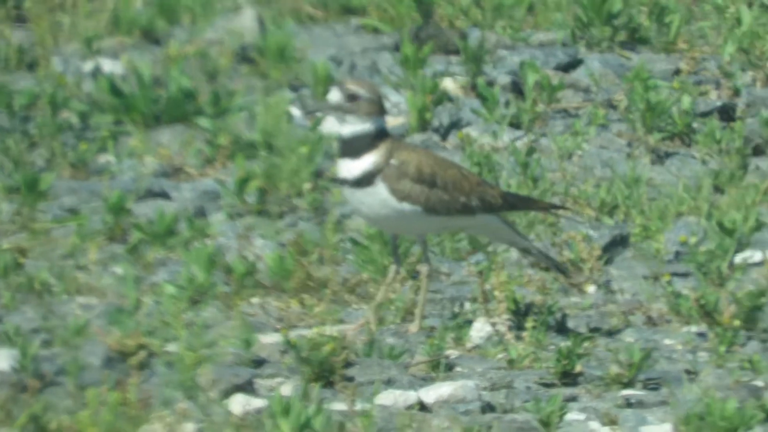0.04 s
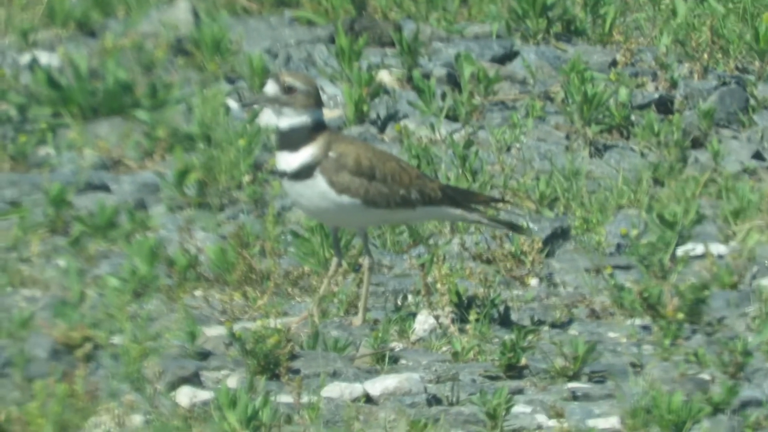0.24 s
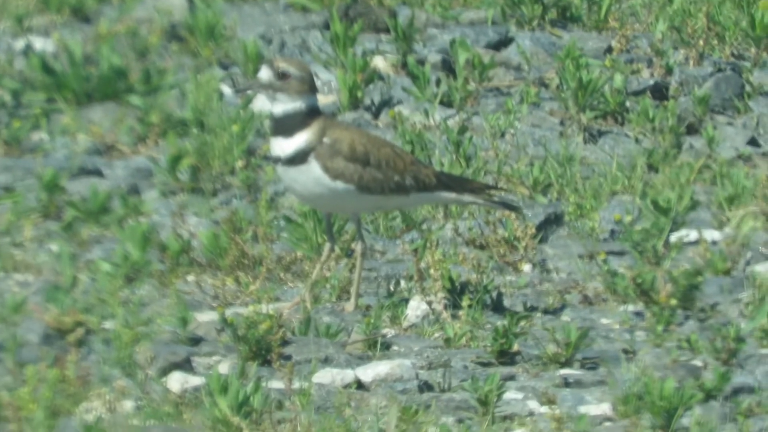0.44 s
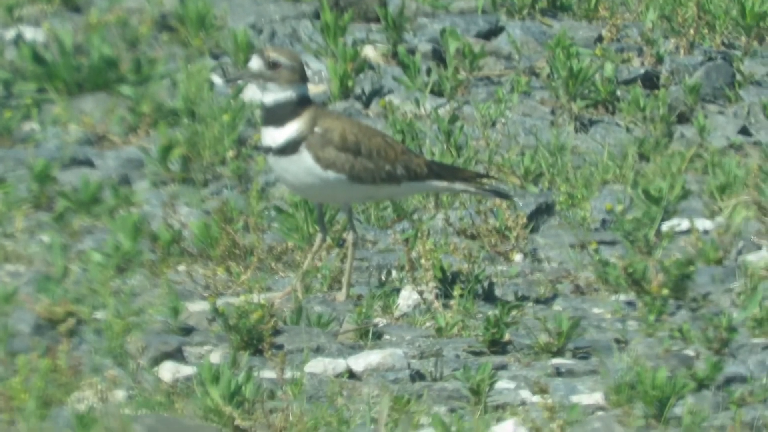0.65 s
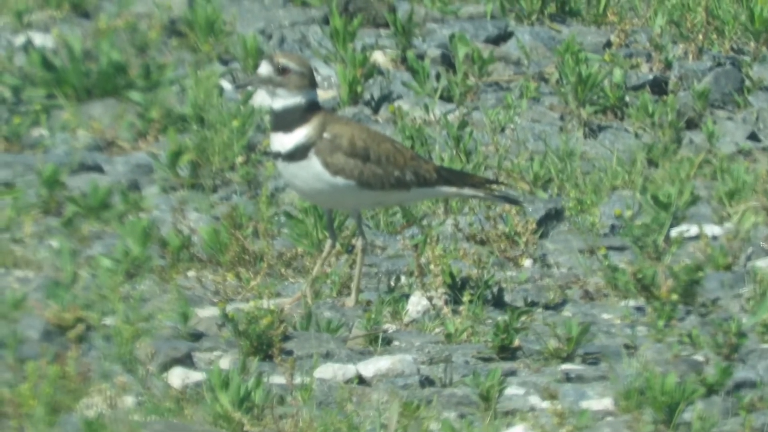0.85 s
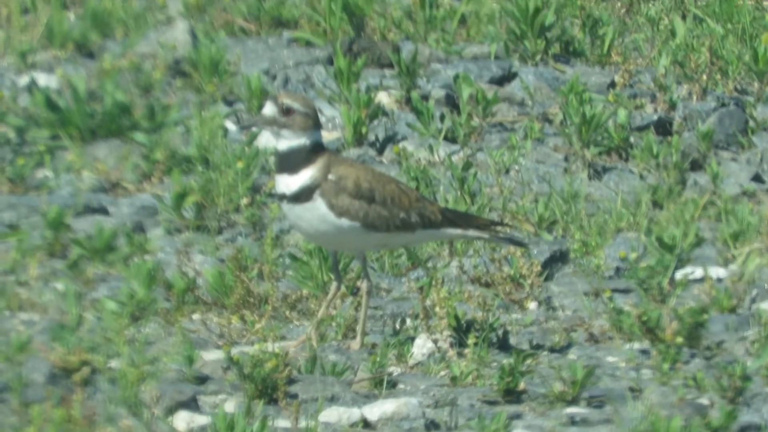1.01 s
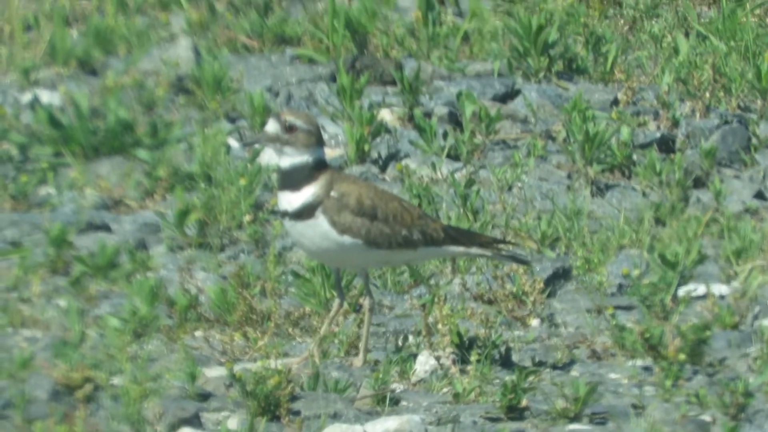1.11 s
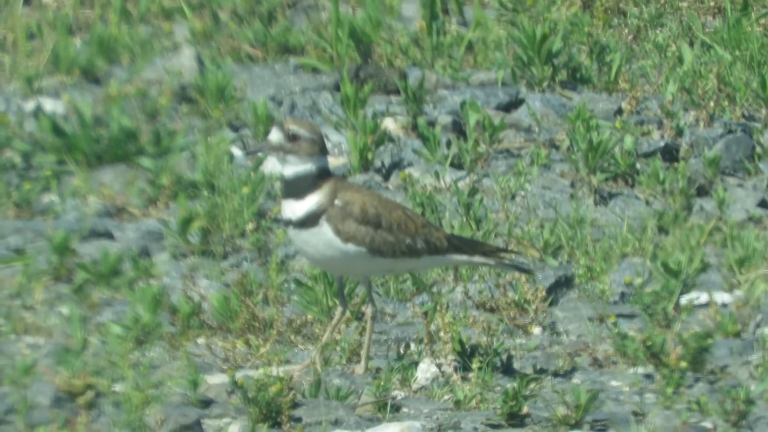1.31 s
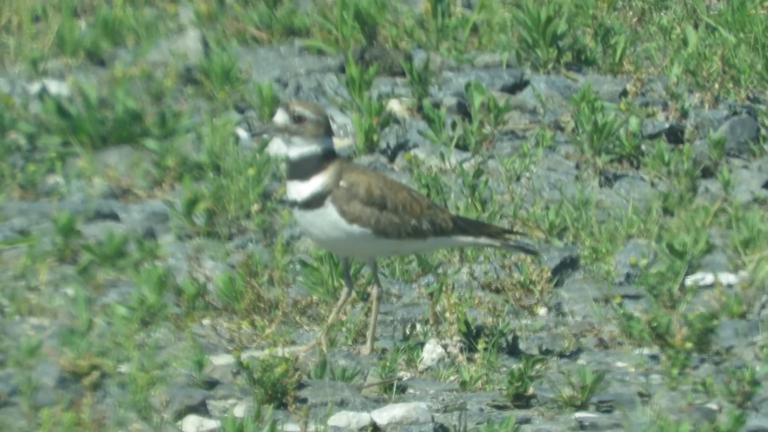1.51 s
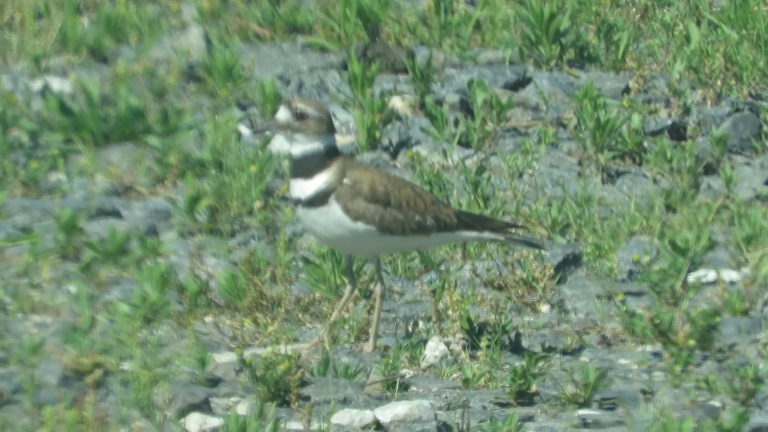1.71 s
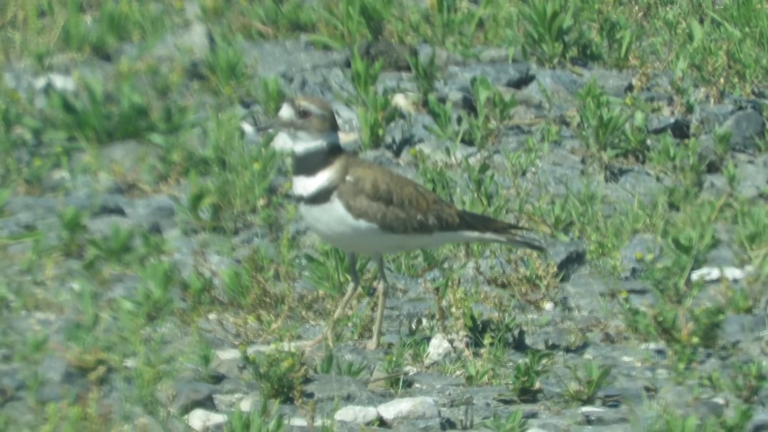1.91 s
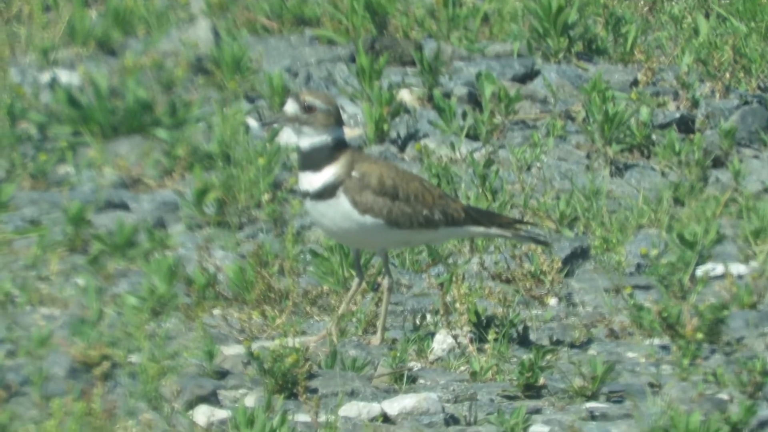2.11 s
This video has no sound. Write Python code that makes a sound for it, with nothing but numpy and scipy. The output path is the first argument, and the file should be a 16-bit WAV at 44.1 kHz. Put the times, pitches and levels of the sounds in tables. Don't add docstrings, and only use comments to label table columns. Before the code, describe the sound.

Four bright, brief bird pipes ring out, with fainter whistles and chips behind and soft outdoor hiss.

```python
import sys
import numpy as np
from scipy import signal
from scipy.fft import rfft, irfft, next_fast_len
from scipy.io import wavfile
from scipy.ndimage import uniform_filter1d, minimum_filter1d

SR = 44100
rng = np.random.default_rng(int(sys.argv[2]) if len(sys.argv) > 2 else 0)


def master(y):
    cut = np.clip(np.atleast_2d(y).T, -1, 1)
    pcm = np.round(cut * 32767)
    wavfile.write(sys.argv[1], SR, pcm.astype(np.int16))


def invert_db(x):
    u = np.asarray(x, float) / 20
    return 10 ** u


N = 94815
LEAD = SR // 2


def read(points, hz):
    f, value = np.transpose(points)
    return np.interp(np.log(hz + 1), np.log(f + 1), value)


def add(mix, s, sound):
    part = mix[round(s * SR) + LEAD:][:len(sound)]
    part += sound[:len(part)]


def wander(length, size):
    noise = rng.standard_normal(length)
    return uniform_filter1d(uniform_filter1d(noise, size=size), size=size)


def turns(hz):
    wobble = 0.0014 * 24 * wander(len(hz), 400)
    return 2 * np.pi * (np.cumsum(hz * (1 + wobble)) / SR + rng.random())


def curve(rows):
    rows = np.array(rows)
    t = np.arange(rows[0, 0], rows[-1, 0], 1 / SR)
    ends = np.clip(np.minimum(t - t[0], t[-1] - t) / 0.0018, 0, 1)
    lines = [np.interp(t, rows[:, 0], column) for column in rows[:, 1:].T]
    return t, ends, [uniform_filter1d(line, size=70, mode="nearest") for line in lines]


def call(stretch, effort_db, hz, bright_db, hold_db):
    # (time from start [s], pitch / resting pitch, effort [dB])
    shape = [
        (0, 0.92, -25),
        (.002, 1.025, -7.5),
        (.012, 1.068, 0.5),
        (.028, 1.036, -1),
        (.046, 1.0, -2.5),
        (.1, 1.0, 1.5),
        (.118, 1.027, 0),
        (.126, 1.015, -9.5),
        (.137, 0.99, -32),
    ]
    partials_db = [-7.5, .5, -20, -19, -42, -41.5, -39]
    lift_db = [-2, .1, 5, -1, 6, 4, .1]
    t, ends, (bend, db) = curve(np.array(shape) * [stretch, 1, 1])
    phase = turns(hz * bend)
    late = np.clip((t - t[0]) / 0.008, 0, 1) ** 3
    lift = np.clip((bend - 1) / 0.03, 0, 1) * (t > 0.003) + (t <= 0.003)
    voice = invert_db(-46) * np.cos(0.868 * phase)
    for k, partial_db in enumerate(partials_db):
        level_db = partial_db + k * bright_db + lift_db[k] * (lift - 0.5)
        if k == 1:
            level_db = level_db + hold_db * (1 - lift)
        partial = invert_db(level_db) * np.cos((k + 1) * phase)
        voice += partial * late if k % 2 == 0 else partial
    return np.sqrt(2) * ends * invert_db(effort_db + db) * voice


def near_calls():
    # (start [s], stretch, effort [dB], resting pitch [Hz], brightness per partial [dB])
    calls = [
        (-.265, 1.0, -23, 2160, .01),
        (.1945, 0.97, -23, 2167, 0.1),
        (0.6317, 1.024, -23.5, 2150, 0.35),
        (1.229, 1.0, -24, 2125, 0.25),
        (1.7925, 1.005, -24.5, 2122, 0.07),
    ]
    holds_db = [0, -2.5, -8, -5.5, -4.5]
    ground_s, ground_share = 0.00212, 0.28
    mix = np.zeros(N + LEAD)
    for (s, *settings), hold_db in zip(calls, holds_db):
        add(mix, s, call(*settings, hold_db))
    size = next_fast_len(len(mix))
    f = np.fft.rfftfreq(size, 1 / SR)
    ground = 1 + ground_share * np.exp(-2j * np.pi * f * ground_s)
    ground = ground / np.sqrt(1 + ground_share ** 2)
    return irfft(rfft(mix, size) * ground, size)[:len(mix)]


def echo(x, colour, slower, banks_db):
    # (pitch [Hz], time [s])
    echo_t60 = [(1500, .15), (3000, 0.18), (4400, .09), (8000, 0.069)]
    # (delay [s], level [dB])
    banks = [
        (.01198, 4.5),
        (.03, -5),
        (.05, -16),
    ]
    taps = np.zeros(SR)
    count = SR // 20 - 1
    spots = np.arange(0, SR - 20, 20) + rng.integers(0, 20, count)
    taps[spots] = rng.choice([-1., 1.], count)
    hz, t, z = signal.stft(taps, SR, nperseg=256)
    fade = invert_db(-60 * t / (slower * read(echo_t60, hz)[:, None]))
    fade = fade + invert_db(-15 - 60 * t / 0.34)
    reach_s, reach_fade_s = 0.168, 0.01
    fade = fade / (1 + np.exp(np.clip((t - reach_s) / reach_fade_s, -50, 50)))
    fade = fade + invert_db(-47 - 60 * t / 1.2)
    tail = signal.istft(z * fade, SR, nperseg=256)[1]
    gap_s = 0.0075
    tail = tail * np.clip(np.arange(len(t) * 128 - 128) / SR / gap_s - 1, 0, 1)
    size = next_fast_len(len(x) + len(tail))
    f = np.fft.rfftfreq(size, 1 / SR)
    paths = invert_db(-0.5) * rfft(tail / np.linalg.norm(tail), size)
    for s, db in banks:
        paths = paths + invert_db(db + banks_db) * np.exp(-2j * np.pi * f * s)
    return irfft(rfft(x, size) * paths * invert_db(read(colour, f)), size)[:len(x)]


def air():
    # (pitch [Hz], level per Hz [dB])
    hiss = [(30, -38), (90, -14.5), (186, -5), (380, -10.5), (1400, -13), (2300, -21), (3500, -19.5),
            (12000, -26)]
    # (pitch [Hz], width [Hz], level [dB])
    humps = [
        (194, 17, 3),
        (505, 89, 3.5),
        (1280, 220, 2),
    ]
    frames, hz = N // 1024 + 5, np.fft.rfftfreq(4096, 1 / SR)
    a, b, patches = rng.standard_normal((frames, 2049, 3)).T
    patches = uniform_filter1d(uniform_filter1d(patches, size=42, axis=0), size=4, axis=1) * 13
    gusts_db = 5.5 * 2 * uniform_filter1d(rng.standard_normal(frames), size=4)
    gusts = gusts_db * np.exp(-hz[:, None] / 120)
    colour = read(hiss, hz) - 14.5 * np.clip((hz - 12400) / 300 + 1, 0, 1)
    for hump_hz, width_hz, db in humps:
        colour = colour + db * np.exp(-((hz - hump_hz) / width_hz) ** 2)
    level = invert_db(colour[:, None] + 1.5 * patches + gusts)
    x = signal.istft((a + 1j * b) * level, nperseg=4096, noverlap=3072)[1][:N]
    return invert_db(-67.5) * x / x.std()


def far_chips():
    # (start [s], length [s], level [dB], from [Hz], to [Hz])
    chips = [
        (1.56, .033, -39, 4680, 4380),
        (1.678, .03, -54, 4600, 4400),
        (.182, .008, -50, 2750, 2630),
        (.345, 0.07, -50, 5140, 5130),
        (.265, .03, -58, 5160, 5150),
        (1.612, .06, -42, 3265, 3205),
        (1.453, .02, -33, 3420, 3410),
        (1.47, .014, -34.5, 3100, 3400),
    ]
    mix = np.zeros(N + LEAD)
    for s, length, db, from_hz, to_hz in chips:
        u = np.arange(0, 1, 1 / (length * SR))
        tone = np.cos(turns(from_hz + (to_hz - from_hz) * u))
        add(mix, s, invert_db(db) * np.sin(np.pi * u) ** 2 * tone)
    return mix


def bill_clicks():
    # (time [s], peak level [dB])
    clicks = [
        (0.19, -37.5),
        (0.626, -37),
        (1.2218, -37.5),
        (1.786, -37),
    ]
    mix, t = np.zeros(N + LEAD), np.arange(-60, 60) / SR
    width_s = 0.00028 * np.where(t > 0, 1.6, 1)
    body = np.sin(-2 * np.pi * 2100 * t)
    edge = invert_db(-16.5) * np.cos(2 * np.pi * 5140 * t)
    tick = invert_db(9) * np.exp(-(t / width_s) ** 2) * (body + edge)
    for s, db in clicks:
        add(mix, s, invert_db(db) * tick)
        add(mix, s - 0.0015, invert_db(db - 19) * tick)
        add(mix, s + 0.002, -invert_db(db - 7.5) * tick)
        add(mix, s + 0.0033, invert_db(db - 17) * tick)
    return mix


def far_whistles():
    # (time [s], pitch [Hz], level [dB], octave level [dB])
    whistles = [
        [(0.235, 2578, -57, -81.5), (0.257, 2579, -46, -93), (0.261, 2589, -49.5, -82), (0.273, 2463, -40, -75),
         (0.287, 2533, -24, -65), (0.297, 2570, -24.5, -47), (0.309, 2579, -22, -40), (0.319, 2558, -21.5, -50),
         (0.345, 2500, -44, -56)],
        [(0.335, 2440, -56, -62), (0.348, 2430, -46, -45), (.385, 2450, -38, -43), (0.428, 2506, -27, -34),
         (0.47, 2574, -24, -44), (0.54, 2614, -24, -28.5), (0.566, 2657, -33.5, -36), (0.6, 2680, -30, -58),
         (0.63, 2660, -46, -66)],
        [(2.125, 2450, -78.5, -92.5), (2.133, 2560, -75, -100), (2.141, 2575, -55.5, -91.5),
         (2.15, 2573, -54.5, -78)],
    ]
    # (time [s], pitch [Hz], level [dB], octave level [dB])
    short_notes = [
        [(1.535, 2353, -74.5, -79.5), (1.545, 2353, -49.5, -65), (1.563, 2315, -30.5, -38),
         (1.599, 2376, -49.5, -77.5), (1.603, 2380, -56, -94), (1.61, 2362, -61, -74.5)],
        [(1.635, 2387, -62.5, -77), (1.655, 2396, -46.5, -68.5), (1.673, 2373, -33.5, -45.5),
         (1.683, 2363, -37, -44), (1.691, 2372, -48.5, -72), (1.705, 2360, -63.5, -59.5)],
    ]
    # (time [s], pitch [Hz], level [dB])
    pipes = [
        [(0.545, 3121, -74), (0.563, 3150, -59.5), (0.587, 3197, -55.5), (0.607, 3214, -31), (0.649, 3132, -32),
         (0.659, 3118, -46), (0.67, 3190, -52), (.7, 3190, -49), (.762, 3170, -68)],
        [(1.44, 3122, -67.5), (1.452, 3132, -53.5), (1.47, 3260, -50), (1.48, 3182, -30.5),
         (1.528, 3132, -30.5), (1.548, 3120, -40), (1.56, 3220, -57)],
        [(1.56, 3180, -63), (1.576, 3160, -41), (1.604, 3157, -38.5), (1.618, 3150, -49), (1.664, 3190, -40),
         (1.688, 3179, -55.5), (1.695, 3170, -55)],
        [(1.695, 3157, -58), (1.709, 3243, -54), (1.727, 3235, -45), (1.751, 3234, -58), (1.773, 3247, -62),
         (1.82, 3200, -72), (1.88, 3230, -84)],
    ]
    mix = np.zeros(N + LEAD)
    for rows in list(whistles) + list(short_notes) + list(pipes):
        t, ends, (hz, *levels_db) = curve(rows)
        phase = turns(hz)
        tone = sum(invert_db(db) * np.cos((k + 1) * phase) for k, db in enumerate(levels_db))
        add(mix, t[0], ends * tone)
    return mix


def far_buzzes():
    # (time [s], level [dB])
    buzzes = [
        [(1.29, -84), (1.312, -56), (1.329, -53), (1.342, -36), (1.357, -58), (1.39, -64), (1.417, -44),
         (1.455, -45), (1.51, -64)],
        [(1.578, -78), (1.603, -44), (1.619, -35), (1.64, -56), (1.67, -54), (1.72, -74)],
    ]
    # (pitch [Hz], level [dB])
    buzz_lines = [
        [(3445, -2), (3640, -4), (3830, -2), (3965, -13)],
        [(3420, -11), (3655, -8), (3855, -3), (3970, -2)],
    ]
    mix = np.zeros(N + LEAD)
    for rows, lines in zip(buzzes, buzz_lines):
        t, ends, (effort_db,) = curve(rows)
        for hz, db in lines:
            flutter_db = 3 * 21 * wander(len(t), 300)
            level = invert_db(db + effort_db - 3 + flutter_db)
            add(mix, t[0], level * ends * np.cos(turns(hz + 0 * t)))
    return mix


def scene():
    # (pitch [Hz], level [dB])
    near_colour = [(1500, -26), (2200, -21), (3200, -16), (4400, -8.5), (5500, -13.5), (6500, -20.5),
                   (9000, -23.5), (14000, -38)]
    # (pitch [Hz], level [dB])
    far_colour = [(2200, -18), (3200, -16), (4000, -11.5), (5300, -11.5), (6500, -20)]
    near = near_calls() + bill_clicks()
    far = np.sqrt(2) * (far_chips() + far_whistles() + far_buzzes())
    birds = near + far
    birds = birds + invert_db(-3.5) * echo(near, near_colour, 1, 0)
    birds = birds + invert_db(0.5) * echo(far, far_colour, 1.15, -12)
    return (birds[LEAD:] + air())[None]


def masked(x):
    hz, t, z = signal.stft(x, SR, nperseg=1024, noverlap=768)
    hz = hz[:, None]
    db = 10 * np.log10(abs(uniform_filter1d(abs(z) ** 2, size=7, axis=0)) + 1e-20)
    loudest = -minimum_filter1d(-db, size=71, axis=0)
    fall = 160 * t
    loudest = np.maximum.accumulate(loudest + fall, axis=1) - fall
    limit_db = loudest - 57 + 3.2 * (hz / 1000 - 3)
    hidden = np.clip((limit_db - db) / 4, 0, 1) * np.clip((hz - 2000) / 200, 0, 1)
    top_hz, top_width_hz = 15050, 150
    edge = 1 / (1 + np.exp(np.clip((hz - top_hz) / top_width_hz * 4, -50, 50)))
    return signal.istft(z * invert_db(-24 * hidden) * edge, SR, nperseg=1024, noverlap=768)[1][:N]


def top_cut(x):
    return signal.sosfilt(signal.butter(12, 15300, fs=SR, output="sos"), x)


def record(dry):
    mix = masked(dry[0])[None]
    return top_cut(mix)


dry = scene()
out = record(dry)
master(out)
```